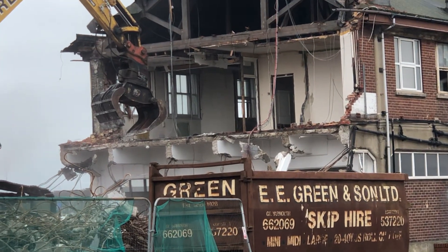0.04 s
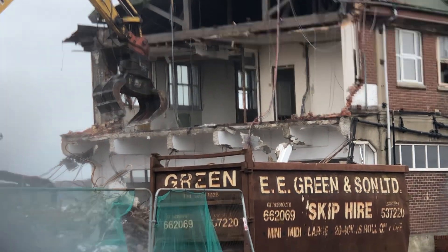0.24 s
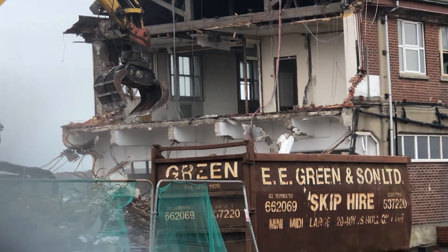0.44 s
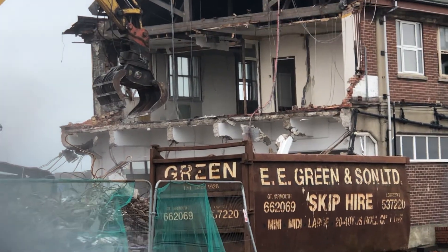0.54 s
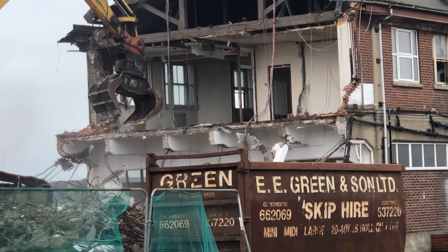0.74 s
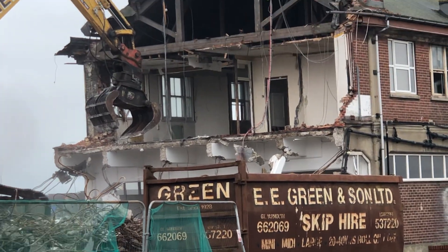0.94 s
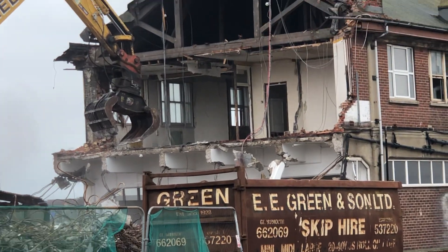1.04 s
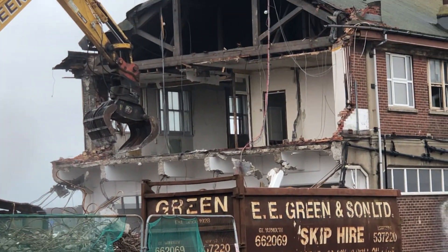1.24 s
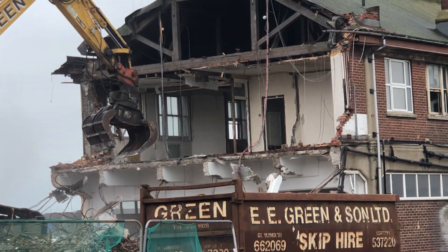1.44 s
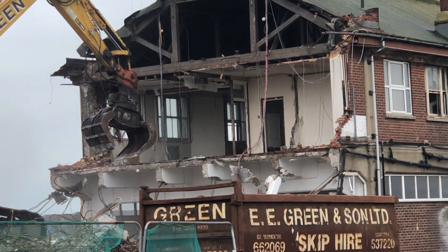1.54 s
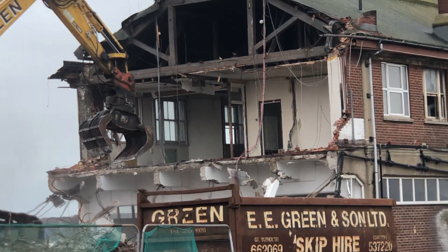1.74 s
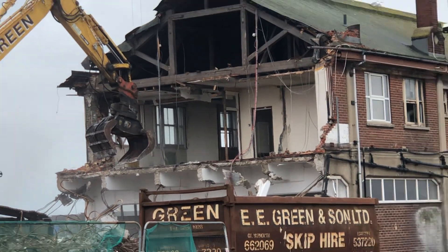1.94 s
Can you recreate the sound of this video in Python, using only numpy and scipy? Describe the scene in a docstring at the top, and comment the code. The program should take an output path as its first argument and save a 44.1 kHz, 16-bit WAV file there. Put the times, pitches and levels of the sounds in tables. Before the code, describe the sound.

Hard, dry knocks and a short slipping judder come from a stand close to the microphone. After a pause it knocks twice more, while an excavator hums far off on a demolition site, ending with a faint low swell.

```python
"""A stiff mount close by takes a hard knock, judders as it slips for almost half a second, then takes
two more dry knocks. Its bending waves are dispersive: treble travels fastest, so each knock falls
quickly from a crack to a thud. Stick-slip friction drives the judder, with a thin scrape and small
clicks. Behind it an excavator drones on a demolition site, and near the end comes a faint, low swell
of distant machinery."""
import sys
import numpy as np
from scipy.fft import rfft, irfft
from scipy.io import wavfile
from scipy.ndimage import uniform_filter1d, minimum_filter1d, map_coordinates

SR = 44100
rng = np.random.default_rng(int(sys.argv[2]) if len(sys.argv) > 2 else 0)


def dump(signal):
    """Clip the signal to [-1, 1] and save it as 16-bit WAV at the path in sys.argv[1]."""
    limited = np.clip(np.atleast_2d(signal).T, -1, 1)
    pcm = np.round(limited * 32767).astype(np.int16)
    wavfile.write(sys.argv[1], SR, pcm)


N = 88200


def amp(db):
    """Amplitude ratio of a level in decibels."""
    return 10 ** (np.asarray(db) / 20)


def unit(x):
    """Normalisation to an rms of 1."""
    return x / np.sqrt(np.mean(x ** 2) + 1e-20)


def freqs():
    """Bin frequencies of the zero-padded Fourier transform, in Hz."""
    return np.fft.rfftfreq(2 * N, 1 / SR)


def spectrum(points):
    """Interpolation of (frequency, level) points on a logarithmic frequency axis."""
    hz, db = np.transpose(points)
    return np.interp(np.log(freqs() + 1), np.log(hz + 1), db)


def envelopes(rows):
    """Linear interpolation in time: one curve for each column after the first."""
    times, *columns = np.transpose(rows)
    return [np.interp(np.arange(N) / SR, times, column) for column in columns]


def wobble(rate):
    """Slow random modulation: a spline through `rate` random values a second."""
    return map_coordinates(rng.standard_normal(int(N * rate / SR) + 4), [np.arange(N) * rate / SR])


def filtered(x, response):
    """Linear filtering: multiplication by a frequency response."""
    return irfft(rfft(x, 2 * N) * response)[:N]


def noise(colour):
    """Spectral shaping of white noise, at an rms of 1."""
    return unit(filtered(rng.standard_normal(N), amp(spectrum(colour))))


# Spectra of the engine's rumble and drone (frequency [Hz], relative level [dB])
RUMBLE_SPECTRUM = [(15, -21.5), (38, 0.5), (55, -6), (88, -5.5), (140, -6), (200, -21.5), (330, -29.5),
                   (600, -35), (2000, -69)]
DRONE_SPECTRUM = [(200, -10.5), (380, -10), (600, -5.5), (800, 3), (1150, -2), (1550, -9), (1900, -17),
                  (2300, -27.5), (3000, -30.5), (4500, -38), (8000, -73.5)]
# Envelope of the drone (time [s], level [dB])
DRONE_ENVELOPE = [(0, -59), (.2, -56.5), (.75, -56), (1.1, -57), (1.4, -55), (1.65, -57), (2, -54)]
# Spectral lines of the whine (frequency [Hz], level [dB])
WHINE_LINES = [(590, -73), (775, -72), (818, -81), (953, -71.5), (1055, -67.5), (1179, -67), (2223, -86.5)]

def excavator(line_width_hz=15, rumble_db=-59):
    """Distant machine noise: broadband rumble and drone, with lines broadened by random modulation."""
    t = np.arange(N) / SR
    whine = np.zeros(N)
    for hz, db in WHINE_LINES:
        modulation = wobble(line_width_hz) + 1j * wobble(line_width_hz)
        whine += amp(db) * unit((modulation * np.exp(2j * np.pi * hz * t)).real)
    drone_db, = envelopes(DRONE_ENVELOPE)
    return whine + amp(drone_db) * noise(DRONE_SPECTRUM) + amp(rumble_db) * noise(RUMBLE_SPECTRUM)


# Spectrum of the hiss (frequency [Hz], relative level [dB])
HISS_SPECTRUM = [(1000, -4.5), (4000, 0.5), (6000, -4), (9000, -7.5), (12000, -11), (15500, -14)]

def microphone_hiss(level_db=-75.5):
    """Self-noise of the microphone: a stationary broadband floor."""
    return amp(level_db) * noise(HISS_SPECTRUM)


def bending_response(colour_db, lag_cycles=1.086, knee_hz=33.4):
    """Bending-wave dispersion: a minimum-phase filter plus a group delay of lag_cycles / (f + knee_hz)."""
    cepstrum = irfft(np.log(amp(colour_db)))
    cepstrum[1:N] *= 2  # folding onto positive time makes the response causal
    cepstrum[N + 1:] = 0
    phase_lag = 2 * np.pi * lag_cycles * np.log(1 + freqs() / knee_hz)
    return np.exp(rfft(cepstrum) - 1j * phase_lag)


# Transfer function of the struck mount (frequency [Hz], relative gain [dB])
MOUNT_RESPONSE = [(20, -41), (40, -13.5), (70, 3), (125, 1), (215, 4.5), (310, -2.5), (430, -6), (650, 2),
                  (900, -4.5), (1300, -18.5), (1650, -25), (1900, -35.5), (2350, -37), (3300, -49),
                  (4300, -65.5), (5200, -74.5), (9000, -82), (15000, -90.5)]

def impact(onset, db, colour_db, gain_db=31.5, smoothing_hz=35):
    """Impulse response of the mount to one contact, with a smoothed spectrum so the bass rings only briefly."""
    bins = round(smoothing_hz / freqs()[1])
    smooth_db = uniform_filter1d(spectrum(MOUNT_RESPONSE) + colour_db, size=bins, mode="nearest")
    delay = np.exp(-2j * np.pi * freqs() * onset)
    return irfft(amp(gain_db + db) * bending_response(smooth_db) * delay)[:N]


# Light contacts (time [s], relative level [dB], thud gain [dB], treble gain [dB])
LIGHT_TAPS = [(0.2264, -34, -1.5, -4.5), (0.2553, -13, 17, -16.5), (0.2671, -6.5, -2.5, -6),
              (.2745, -17.5, 1, -3.5), (0.2919, -6, -2.5, -8), (0.3066, -4, -1.5, -19.5),
              (0.3426, -9, -4, -12), (.396, -22.5, 13, -8.5), (.603, -21.5, -12.5, -17.5),
              (.6115, -13.5, -3, -25.5), (.629, -23.5, -5.5, -8), (.646, -29, 17, -6),
              (.6745, -30.5, -7, -2.5), (1.7418, -19, -8, 2.5)]

def taps():
    """Impulsive excitation: light contacts, each with its own balance of bass and treble."""
    out = np.zeros(N)
    for onset, db, thud_db, treble_db in LIGHT_TAPS:
        colour_db = spectrum([(80, thud_db), (200, 0.029), (700, -1.5), (2000, treble_db)])
        out += impact(onset, db, colour_db)
    return out


# Bands of a knock: thud, reference, body, mid, clack, crack, snap, tick (frequency [Hz])
KNOCK_BANDS = [70, 200, 420, 680, 1400, 2600, 4200, 5500]
# Hard contacts (time [s], relative level [dB], notch frequency [Hz], notch depth [dB],
# then gain [dB] in each band but the reference); a negative depth gives a peak
HARD_KNOCKS = [(0.2491, 2, 1850, 13, -24, -1, -1.5, 9.5, 14.5, 16.5, -15.5),
               (0.3326, 1, 1950, 7.5, 1, 4, -7, -3.5, -5, -3.5, 3.5),
               (0.4182, -11.5, 1950, 7, 4, -2.5, -4, -20, -9, -11.5, -14),
               (.596, -9, 1950, 1, -5, 0, -32.5, 2.5, -2, 1, 8.5),
               (1.5121, -2, 2050, 13.5, -3.5, -2, 1.5, -0.5, -11.5, -11.5, -3),
               (1.7314, -13.5, 1900, -4, 15.5, 12, 4.5, 9.5, 5, 19.5, 9.5)]

def knocks(notch_width_hz=130):
    """Hard impacts: a contact pulse of finite duration has a notch in its spectrum."""
    out = np.zeros(N)
    for onset, db, notch_hz, depth_db, thud_db, *upper_db in HARD_KNOCKS:
        colour_db = spectrum(list(zip(KNOCK_BANDS, [thud_db, 0, *upper_db])))
        notch_db = depth_db * np.exp(-((freqs() - notch_hz) / notch_width_hz) ** 2)
        out += impact(onset, db, colour_db - notch_db)
    return out


def friction_force(slips_per_s=110, jitter_periods=.3, spread_db=.5, grains_per_s=1500, grit_db=2):
    """Stick-slip friction: a nearly periodic pulse train, plus random impulses from fine grit."""
    timing, strength = rng.standard_normal((400, 2)).T
    onsets = (np.arange(len(timing)) + jitter_periods * timing) / slips_per_s
    samples = np.clip((onsets * SR).astype(int), 0, N)
    slips = np.bincount(samples, amp(spread_db * strength), N + 1)[:N]
    grit = (rng.random(N) < grains_per_s / SR) * rng.standard_normal(N)
    return unit(slips) + amp(grit_db) * unit(grit)


# Envelope of the slip (time [s], relative level [dB], treble gain [dB])
SLIP_ENVELOPE = [(.255, -59.5, 11.5), (.266, -10, -4), (.305, -16, 2), (.325, -24.5, 6.5),
                 (.36, -18.5, 1.5), (.39, -20.5, -6), (.43, -19.5, -6.5), (.5, -22, -12),
                 (.56, -25.5, -10.5), (.59, -31, -5), (.655, -33, -10), (.68, -43, -7), (.695, -61, 5)]
# Transfer function of the rubbed mount (frequency [Hz], relative gain [dB])
RUB_RESPONSE = [(25, -42.5), (55, -22), (80, -14), (130, -5.5), (200, 2.5), (330, -9), (450, -12),
                (600, -2), (760, -7), (920, -19.5), (1050, -21), (1350, -17.5), (1680, -22.5),
                (1850, -60.5), (2500, -56), (4400, -80), (15000, -100)]
# Normal modes of the mount (frequency [Hz], relative level [dB], 60 dB decay time [s])
MOUNT_MODES = [(81.5, 15, .2), (101.6, 10, .2), (178, 5.5, 0.6), (204.7, -3, 0.05), (285, -2, .2),
               (339, -23.5, 0.25), (404, -34, .2), (555, -12.5, 0.9), (569.4, -0.5, 0.45), (627, 2.5, 0.14),
               (664.7, -9.5, 0.083), (700, 3.5, .2), (1374, -19.5, 0.45), (1365, -23.5, 0.33)]

def judder(gain_db=-3, ring_db=-6, shelf_hz=720):
    """Forced vibration: friction launches bending waves in the mount and keeps its modes ringing."""
    t = np.arange(N) / SR
    force = friction_force()
    modes = sum(amp(db - 60 * t / t60) * np.sin(2 * np.pi * hz * t) for hz, db, t60 in MOUNT_MODES)
    waves = unit(filtered(force, bending_response(spectrum(RUB_RESPONSE))))
    ringing = unit(filtered(force, rfft(modes, 2 * N)))
    shake = waves + amp(ring_db) * ringing
    treble = filtered(shake, 1 / (1 + (shelf_hz / (freqs() + 1)) ** 6))
    level_db, treble_db = envelopes(SLIP_ENVELOPE)
    return amp(level_db + gain_db) * (shake + (amp(treble_db) - 1) * treble)


# Envelope of the scrape (time [s], level [dB])
SCRAPE_ENVELOPE = [(.255, -73.5), (.266, -60), (.282, -56.5), (.305, -63.5), (.325, -80.5), (.337, -52),
                   (.36, -61.5), (.42, -76.5), (.56, -81), (.655, -70.5), (.69, -80)]
# Spectrum of the scrape (frequency [Hz], relative level [dB])
SCRAPE_SPECTRUM = [(1000, -25.5), (1900, -0.5), (2300, 8), (2750, -4.5), (3200, -15.5), (4500, -17),
                   (9000, -16), (15000, -31.5)]

def scrape():
    """Friction noise: the dry sliding faces give a thin hiss above the judder."""
    level_db, = envelopes(SCRAPE_ENVELOPE)
    return amp(level_db) * noise(SCRAPE_SPECTRUM)


# Catches of the slip (time [s], relative level [dB])
CATCHES = [(.5845, 4.5), (0.5949, 4.5), (0.6, 5), (.607, -14), (0.649, -3), (0.654, -7)]
# Modes rung by a catch (frequency [Hz], relative level [dB], 60 dB decay time [s])
CATCH_MODES = [(1435, -36.5, 0.017), (1550, -45.5, 0.019), (2320, -46, 0.0067), (4100, -60, 0.0052)]

def clicks(spread_db=2.5, attack_s=0.0006):
    """Damped free vibration: bright modes ring briefly each time the slip catches."""
    t = np.arange(SR // 10) / SR
    attack = 1 - np.exp(-t / attack_s)
    out = np.zeros(N)
    for onset, db in CATCHES:
        for hz, mode_db, t60 in CATCH_MODES:
            decay = amp(db + mode_db + rng.normal(0, spread_db) - 60 * t / t60)
            out[round(onset * SR):][:len(t)] += attack * decay * np.sin(2 * np.pi * hz * t)
    return out


# Envelope of the machinery swell (time [s], level [dB])
SWELL_ENVELOPE = [(1.76, -70), (1.87, -59), (1.89, -45), (1.91, -48.5), (1.96, -54.5), (2, -66)]
# Spectrum of the swell (frequency [Hz], relative level [dB])
SWELL_SPECTRUM = [(20, -11), (55, 3), (120, -2), (250, -19), (550, -4.5), (900, -15.5), (1500, -15),
                  (2000, -32.5), (5000, -66)]

def machinery_swell():
    """Amplitude-modulated noise: a faint, low swell of distant machinery near the end."""
    level_db, = envelopes(SWELL_ENVELOPE)
    return amp(level_db) * noise(SWELL_SPECTRUM)


def scene():
    """Superposition of the distant site and the dry, close mount, in one channel."""
    background = excavator() + microphone_hiss()
    mount = taps() + knocks() + judder() + scrape() + clicks()
    return (background + mount + machinery_swell())[None]


def record(dry, low_cut_hz=24, top_hz=15750, ceiling=.9, hold_s=.004):
    """Band and peak limiting: deep bass and top treble are cut; the gain dips at the loudest peaks."""
    x = filtered(dry[0], 1 / np.sqrt(1 + (low_cut_hz / (freqs() + 1)) ** 8))
    hold = round(hold_s * SR)
    gain = minimum_filter1d(ceiling / np.maximum(np.abs(x), ceiling), size=2 * hold)
    smooth_gain = uniform_filter1d(uniform_filter1d(gain, size=hold), size=hold)
    return filtered(x * smooth_gain, freqs() < top_hz)[None]


dry = scene()
out = record(dry)
dump(out)
```